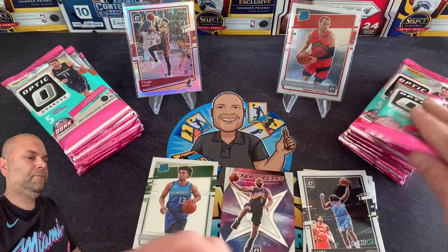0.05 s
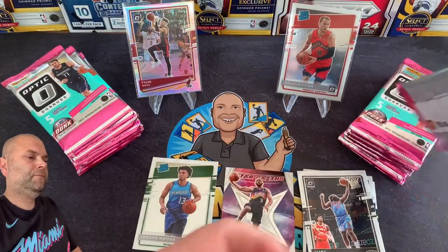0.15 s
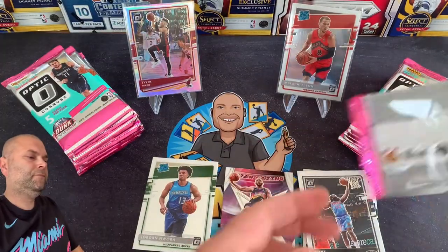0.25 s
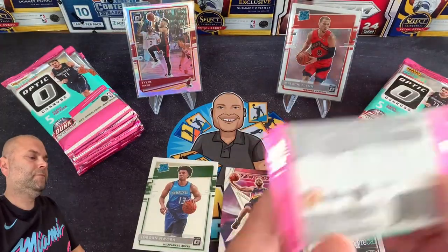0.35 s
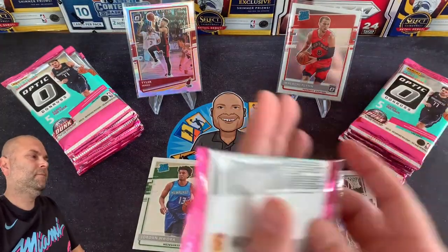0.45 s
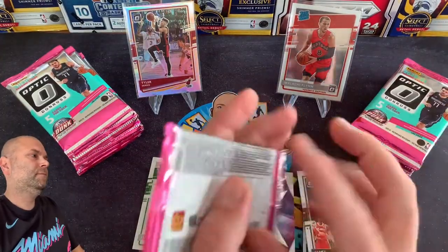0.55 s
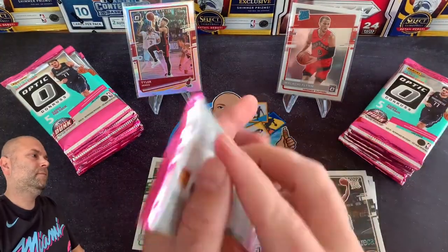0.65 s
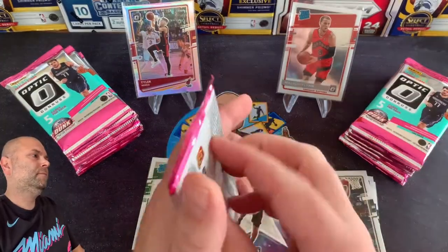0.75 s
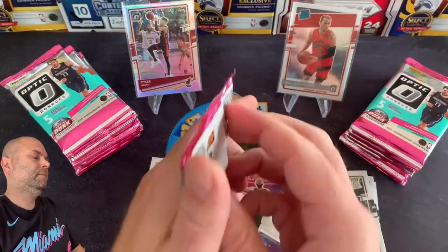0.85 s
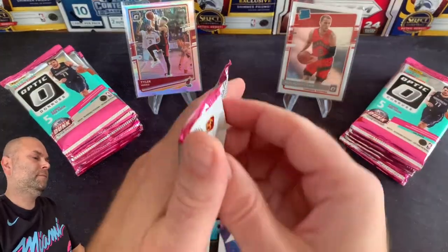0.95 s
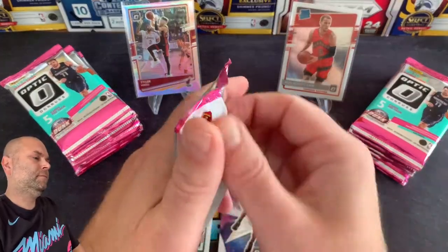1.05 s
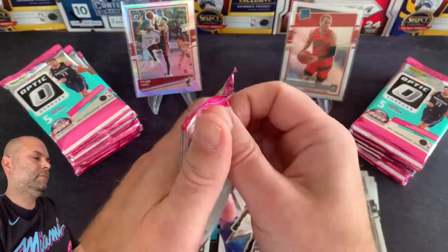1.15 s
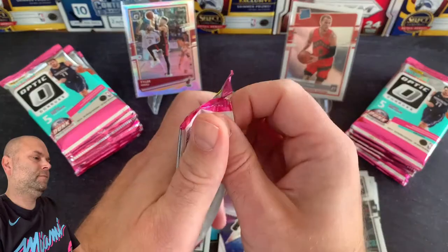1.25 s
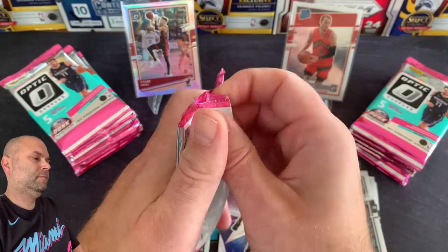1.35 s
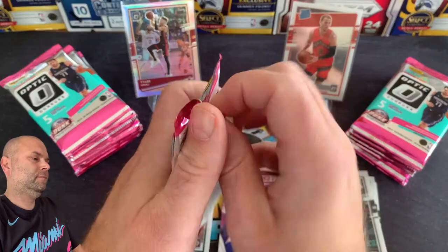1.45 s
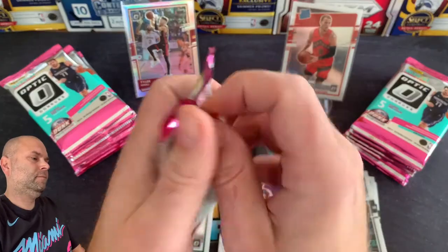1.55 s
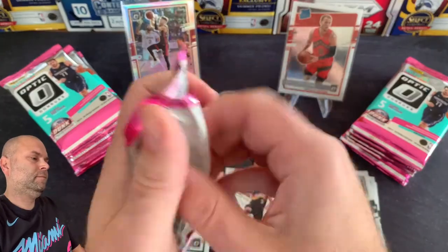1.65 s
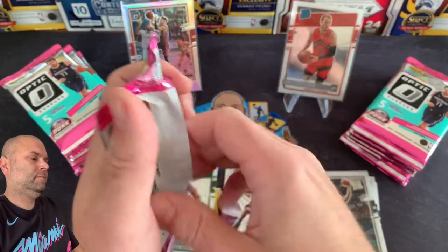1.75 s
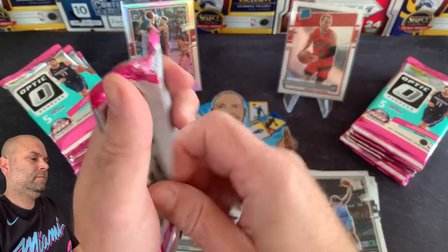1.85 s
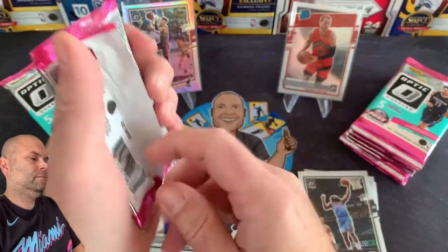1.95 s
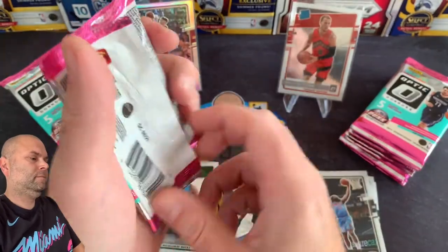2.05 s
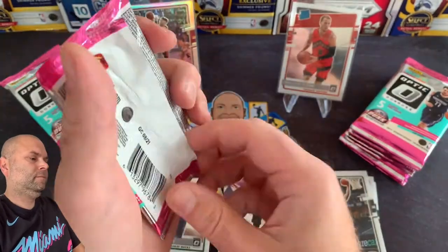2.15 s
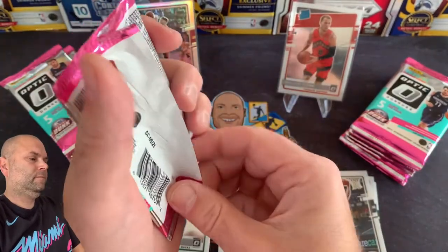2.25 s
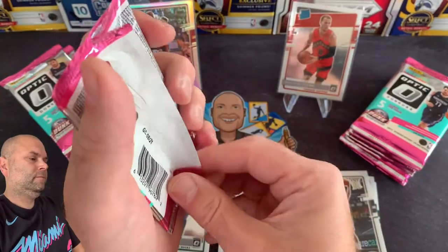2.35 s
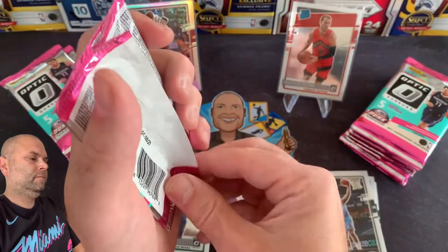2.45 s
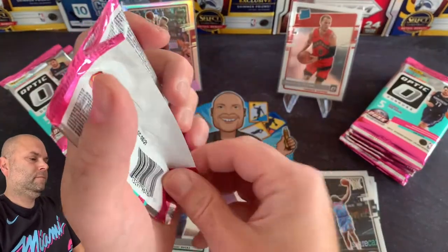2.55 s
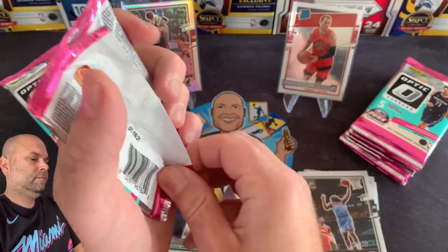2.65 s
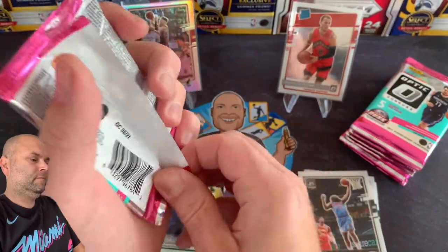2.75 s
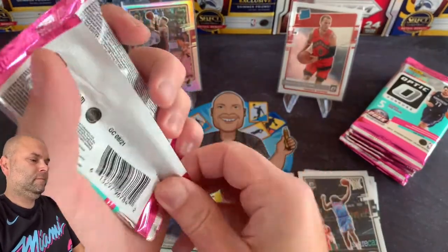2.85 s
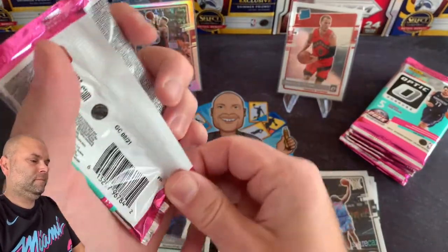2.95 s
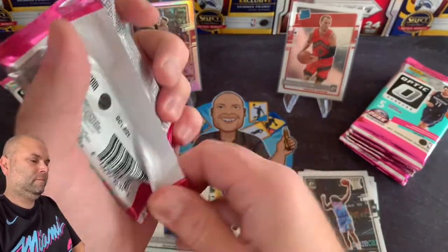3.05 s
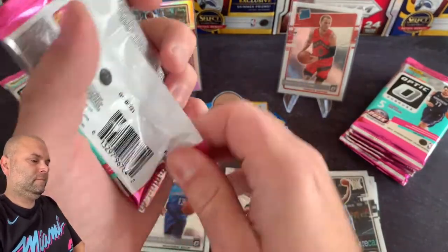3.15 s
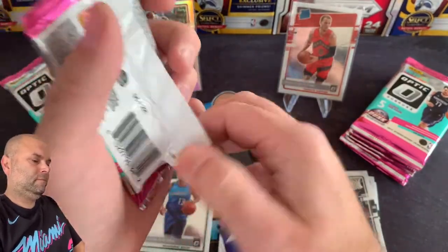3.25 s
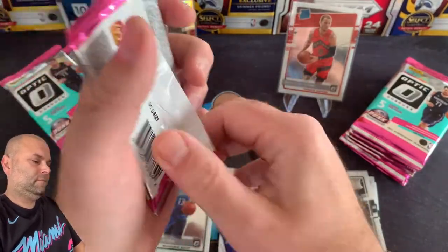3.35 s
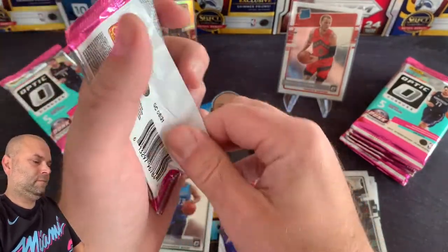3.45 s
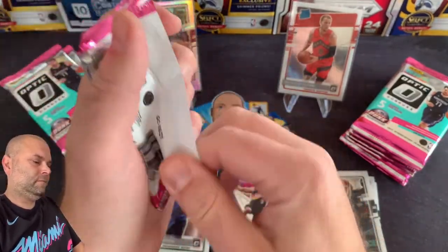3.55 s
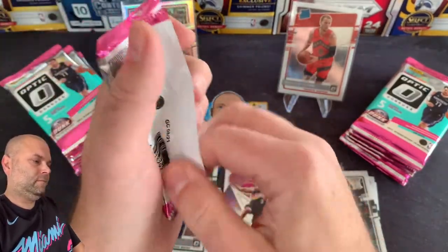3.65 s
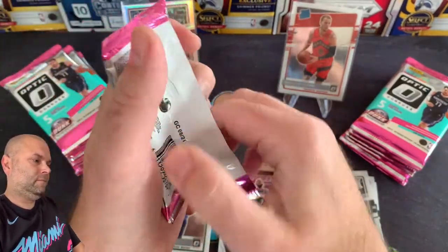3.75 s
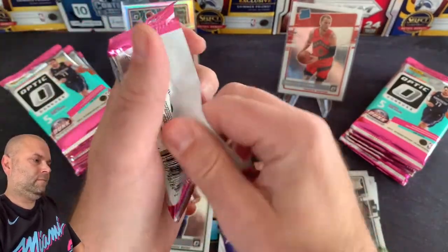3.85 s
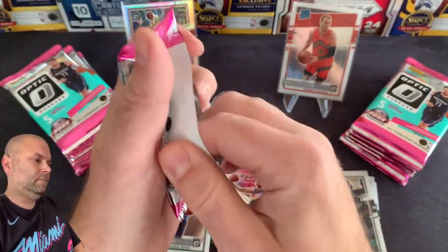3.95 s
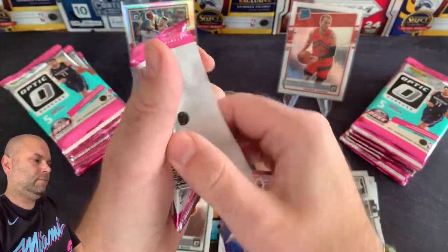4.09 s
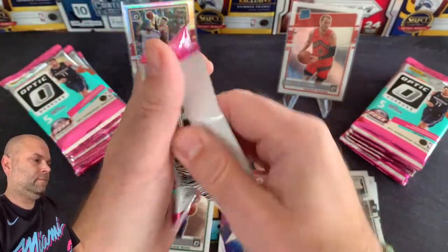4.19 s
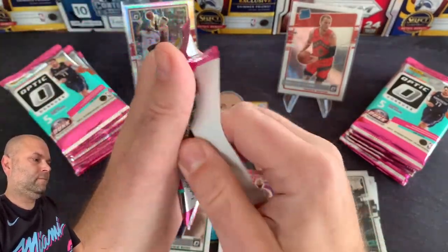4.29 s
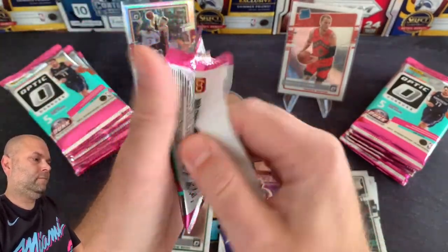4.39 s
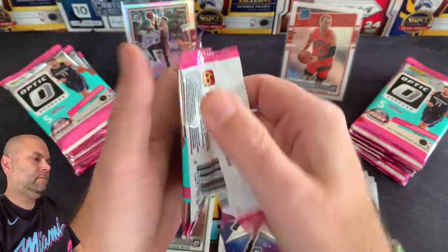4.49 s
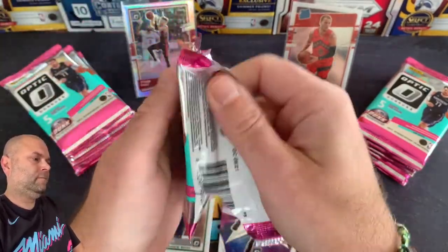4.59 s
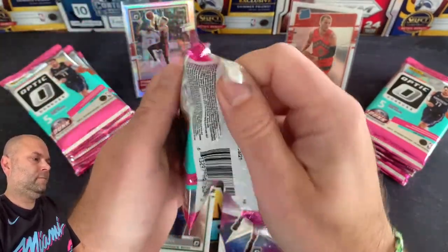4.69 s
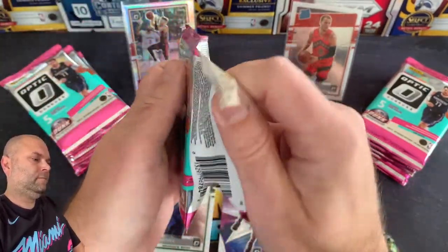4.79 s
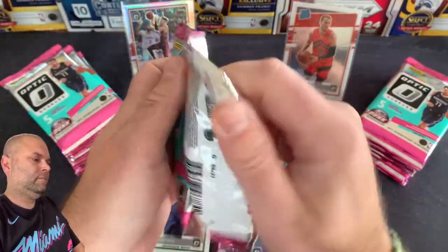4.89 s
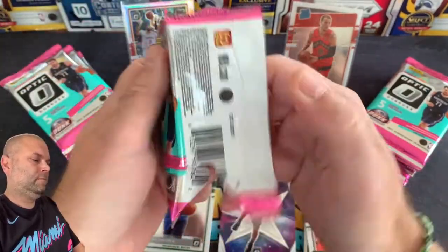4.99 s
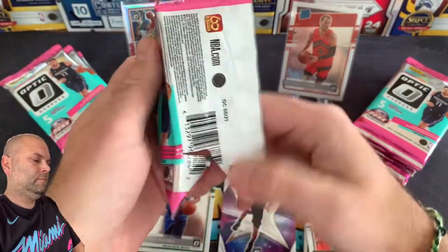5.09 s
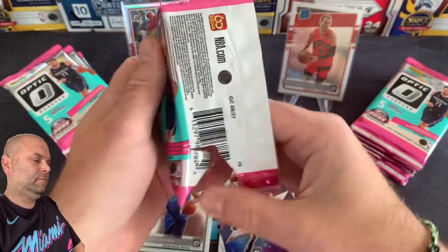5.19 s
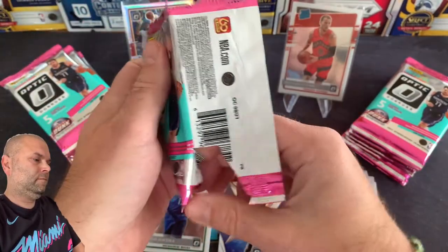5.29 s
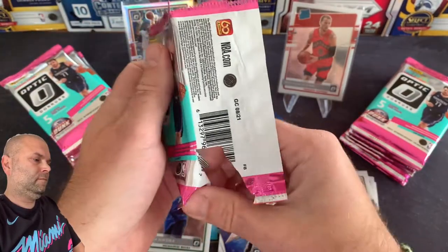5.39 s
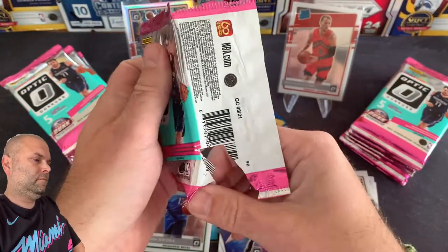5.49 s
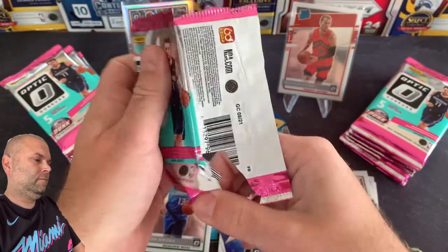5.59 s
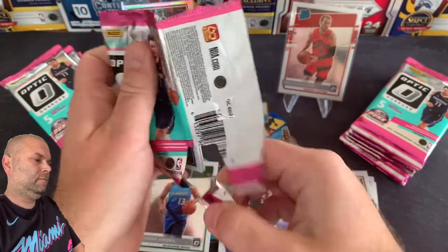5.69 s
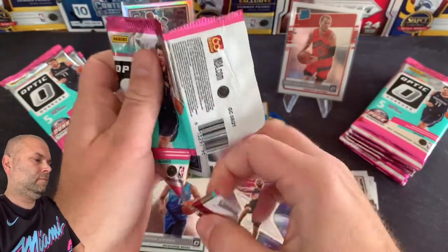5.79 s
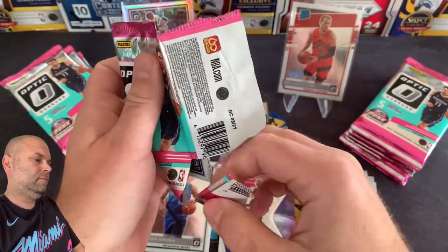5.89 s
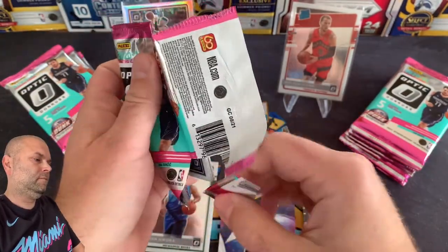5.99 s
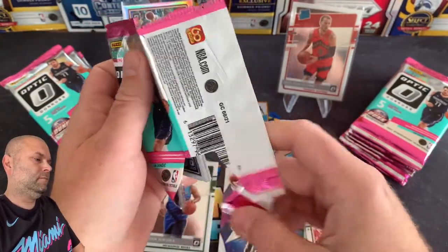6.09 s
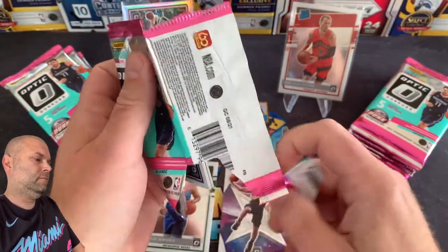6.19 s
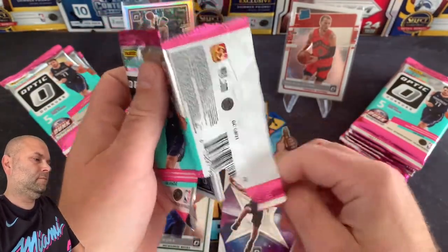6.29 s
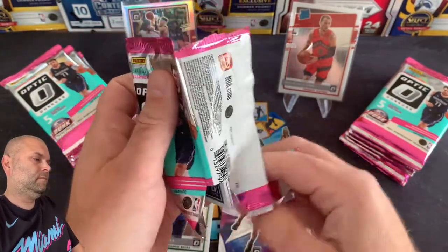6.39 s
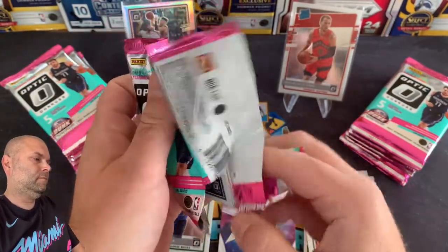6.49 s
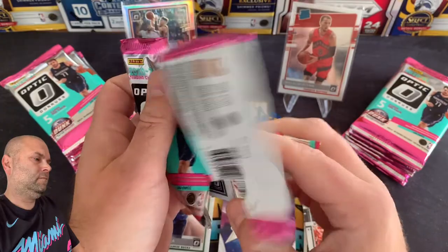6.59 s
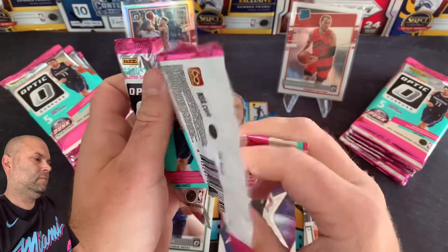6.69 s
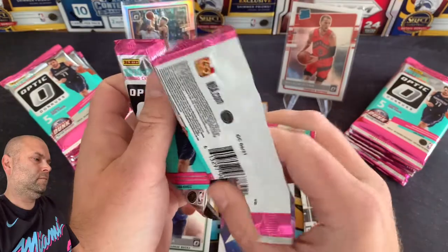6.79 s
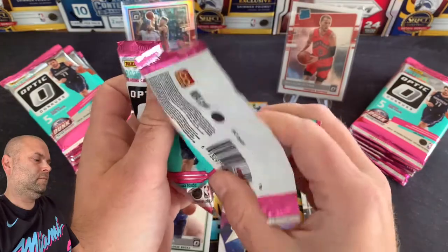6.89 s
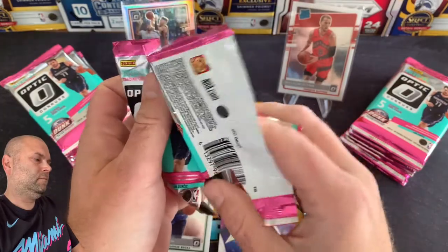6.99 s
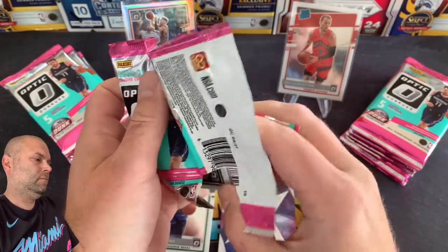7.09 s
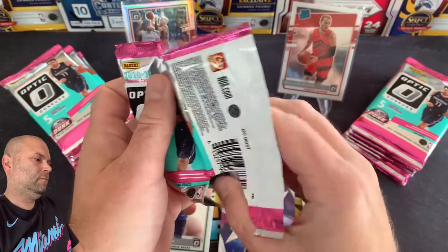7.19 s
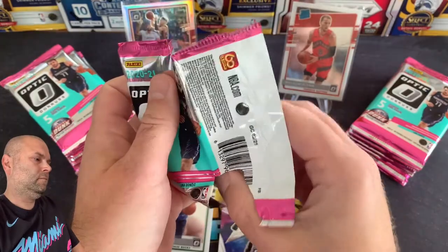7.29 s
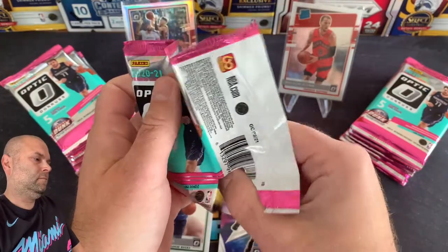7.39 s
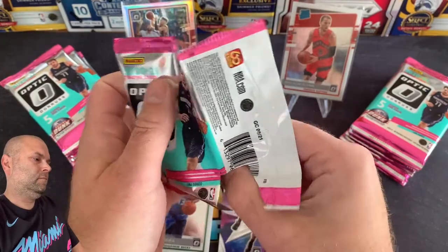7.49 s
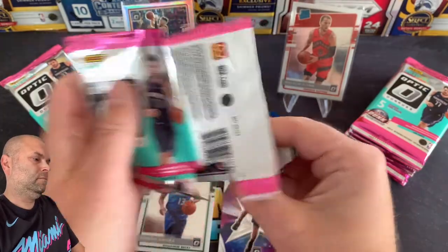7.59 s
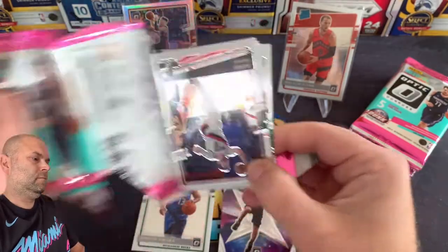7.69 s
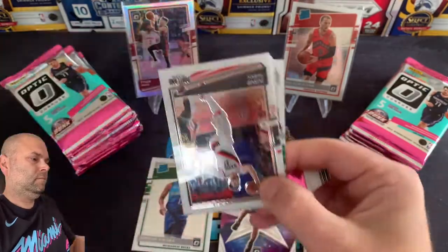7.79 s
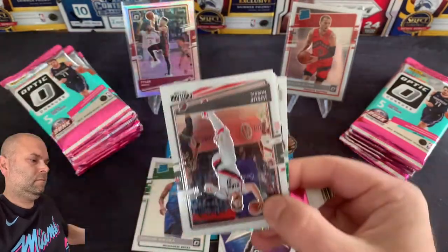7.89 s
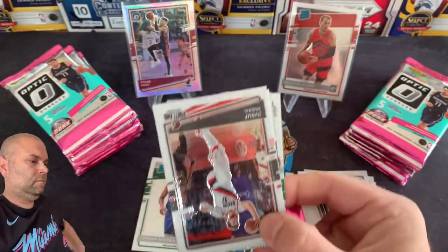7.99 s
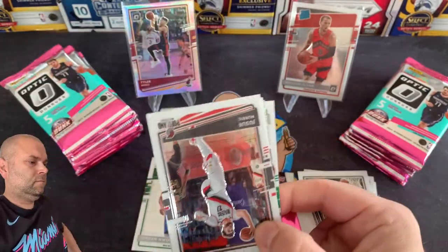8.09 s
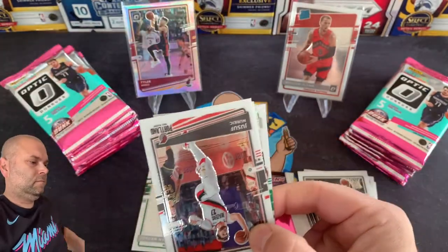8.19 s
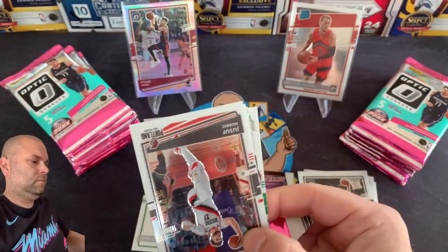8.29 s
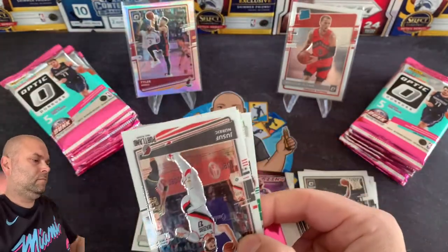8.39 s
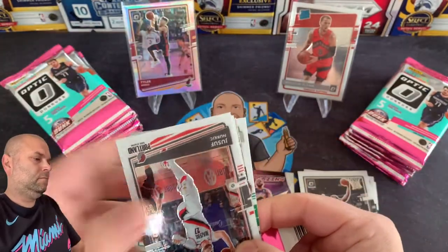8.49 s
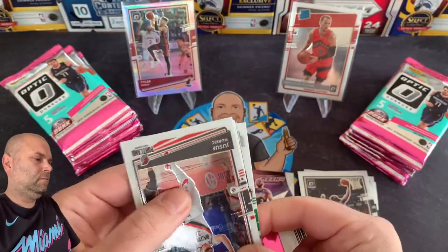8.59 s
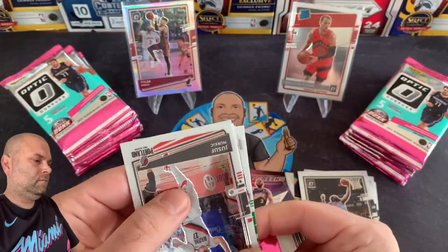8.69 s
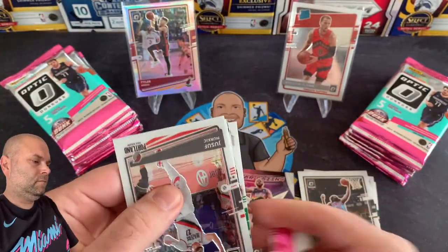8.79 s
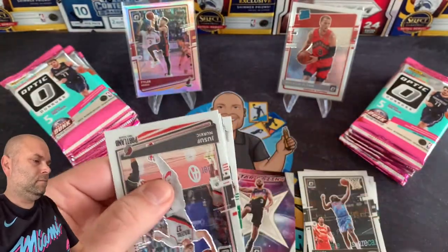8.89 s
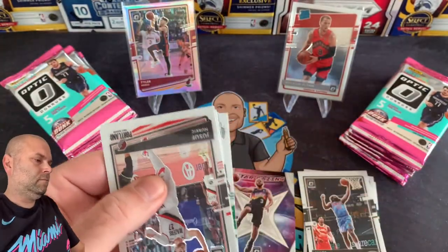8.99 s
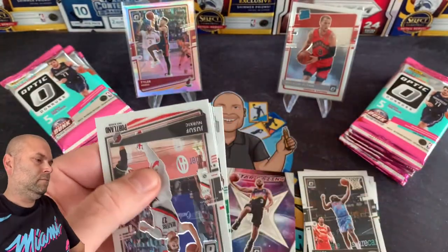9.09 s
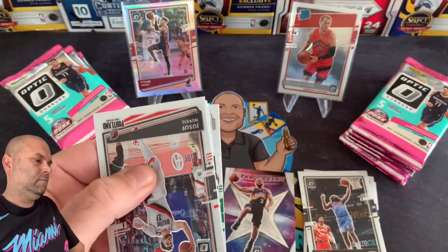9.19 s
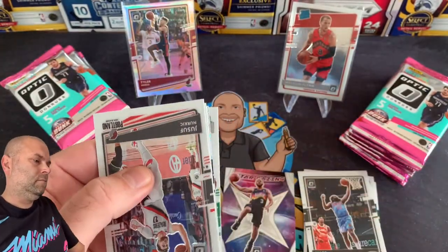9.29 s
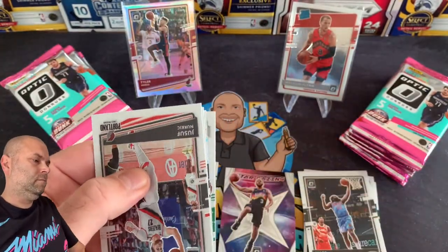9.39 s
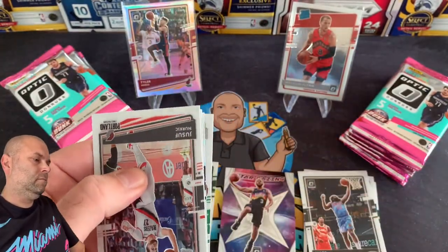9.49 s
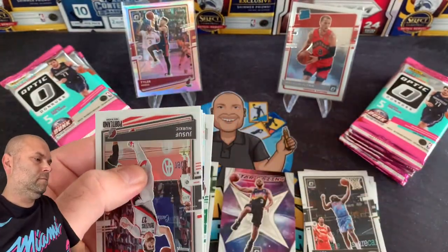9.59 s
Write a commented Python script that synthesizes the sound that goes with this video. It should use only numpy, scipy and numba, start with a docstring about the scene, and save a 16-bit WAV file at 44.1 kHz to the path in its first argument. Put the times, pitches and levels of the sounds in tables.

```python
"""A small foil pack is crinkled, ripped open and emptied of its cards over a desk, close to a phone's two ports.
Foil: each buckling crease rings a few facets as decaying sines; loud snaps stand over random crackle and bursts of ripping.
Cards: fingers thump the stack, heard as short dull clusters of sines; forearms rumble the desk as swells of low noise.
Further off, cards tick and the dropped wrapper settles as swarms of creases.
A hard-walled room answers by convolution with noise tails, over a low air rumble of shaped noise."""
import sys
import numpy as np
from scipy import signal
from scipy.fft import rfft, irfft, next_fast_len
from scipy.io import wavfile
from scipy.ndimage import uniform_filter1d
from numba import njit

SR = 44100
rng = np.random.default_rng(int(sys.argv[2]) if len(sys.argv) > 2 else 0)


def log_audio(samples):
    """Write samples as a 16-bit WAV file to the path given in sys.argv[1]."""
    # one column per channel
    frames = np.atleast_2d(samples).T
    # limit to full scale, then quantise
    limited = np.clip(frames, -1, 1)
    pcm = np.round(limited * 32767).astype(np.int16)
    wavfile.write(sys.argv[1], SR, pcm)


N = 425520  # samples


def undb(db):
    """Logarithmic level: 20 dB is a factor of ten in amplitude."""
    return 10 ** (np.asarray(db) / 20)


def over_hz(table, hz):
    """Logarithmic frequency axis: interpolate a table linearly over log frequency."""
    table_hz, values = np.transpose(table)
    return np.interp(np.log(hz + 1), np.log(table_hz), values)


def colour(x, response):
    """Linear filtering: multiply the spectrum by response(Hz)."""
    size = next_fast_len(x.shape[-1])
    hz = np.arange(size // 2 + 1) * SR / size
    return irfft(rfft(x, size) * response(hz), size)[..., :x.shape[-1]]


@njit
def ring(start, hz, cycles, size, turn, count):
    """Damped resonance: sines swell quickly and die in their number of cycles; two rows of unrelated phase."""
    out = np.zeros((2, count))
    for k in range(len(start)):
        fade = np.log(1000) / cycles[k] * hz[k] / SR
        step = np.exp(2j * np.pi * hz[k] / SR - fade)
        z = size[k] * fade * np.e * np.exp(2j * np.pi * turn[k, 0])
        other = np.exp(2j * np.pi * turn[k, 1])
        first = start[k] - int(1 / fade)  # the swell peaks at the given moment
        for n in range(int(8 / fade)):
            if 0 <= first + n < count:
                out[0, first + n] += n * z.imag
                out[1, first + n] += n * (z * other).imag
            z *= step
    return out


ABOVE_DB_PER_OCTAVE = 1.5  # how much weaker facets become above the strongest one


def octaves_above(hz, facet_hz):
    """Octave measure: distance above the strongest facet, counted up to 8 kHz and to 1.5 octaves."""
    return np.clip(np.log2(np.minimum(hz, 8000) / facet_hz), 0, 1.5) * (hz < 9500)


# relative strength of the foil's facets: (frequency [Hz], level [dB])
FOIL_FACETS = [(300, -26.5), (700, -22), (1300, -9.5), (2000, -4.5), (2700, -5), (3600, 3), (4300, 4),
               (5100, 0), (7000, 10.5), (10000, 5), (13000, 9), (16000, 4.5)]


def creases(s, db, body_db, crisp_db, facet_hz, lift_db, spread_s, bright_db=0., count=10):
    """Buckling: a crease releases its energy into facets over the whole range; one near facet_hz stands out."""
    chance = rng.random((len(s), count, 5))
    crease = np.arange(len(s))
    place = (np.arange(count) + chance[..., 0]) / count
    hz = 300 * (15900 / 300) ** (place ** .75)
    strongest = np.argmin(abs(np.log(hz / facet_hz[:, None])), axis=1)
    hz[crease, strongest] = facet_hz
    chance[crease, strongest, 1:3] = .5, .4  # no scatter: the strongest facet keeps the given moment
    # body acts below 2500 Hz and crispness above 7000 Hz, each complete after an octave
    low, high = np.clip(np.log2(2500 / hz), 0, 1), np.clip(np.log2(hz / 7000), 0, 1)
    facet_db = db[:, None] + over_hz(FOIL_FACETS, hz)
    facet_db += low * body_db[:, None] + high * crisp_db[:, None]
    facet_db += 9 * (chance[..., 1] - .5)
    facet_db[crease, strongest] += lift_db
    facet_db -= ABOVE_DB_PER_OCTAVE * octaves_above(hz, facet_hz[:, None])
    facet_db += np.reshape(bright_db, (-1, 1)) * np.clip(np.log2(hz / 4500), -2, 1)
    # however it is shared among the middle facets, a crease releases the energy that its level says
    middle = (hz > 2000) & (hz < 9000)
    middle_db = 20 * np.log10(np.sqrt(np.sum(middle * undb(facet_db) ** 2, axis=1)))
    facet_db += (db - middle_db)[:, None]
    # the buckle runs along the crease, so the facets do not peak together
    start = ((s[:, None] + spread_s * (chance[..., 2] - .4)) * SR).astype(np.int64)
    cycles = 11 * (hz / 4000) ** 0.6
    cycles[crease, strongest] *= 1.15  # the strongest facet rings on
    turn = chance[..., 3:].reshape(-1, 2)
    return ring(start.ravel(), hz.ravel(), cycles.ravel(), undb(facet_db).ravel(), turn, N)


# relative levels of the air noise: (frequency [Hz], spectral level [dB per Hz])
AIR_SPECTRUM = [(25, 7.5), (60, 1.5), (150, 11.5), (260, 8.5), (450, -17), (900, -19), (2200, -18.5),
                (4000, -31.5), (8000, -30), (16000, -27.5)]
AIR_DB = -47.5  # level before ducking
DUCK_DB, DUCK_RATIO = -29, 1  # threshold [dB], reduction [dB per dB over it]


def ducked_air(close):
    """Shaped noise under gain control: the steady air sinks as the slow average of the close sound rises."""
    air = colour(rng.standard_normal((2, N)), lambda f: undb(over_hz(AIR_SPECTRUM, f)))
    power = uniform_filter1d(close[0] ** 2, int(.8 * SR))
    loud_db = 10 * np.log10(power + 1e-12)
    duck_db = DUCK_RATIO * np.maximum(loud_db - DUCK_DB, 0)
    return air * undb(AIR_DB - duck_db) / air.std()


# course of the handling, relative levels:
# (time [s], crackle between the snaps [dB], card body [dB], crispness [dB])
HANDLING_COURSE = [(0, -37, -0.5, -0.5), (.22, -49, -17, -1.5), (.3, -39.5, -7.5, -1), (.74, -48.5, 7, -8),
                   (.9, -41, -13, -13.5), (.95, -34.5, -8.5, -2.5), (1.71, -32, -3.5, -10.5),
                   (2.0, -34, -9, -9), (2.43, -40, -9.5, -14), (2.58, -40, -8, -18),
                   (2.68, -38.5, -0.5, -21.5), (2.74, -49.5, -1.5, -9.5), (2.98, -26, -4, -8.5),
                   (3.38, -34.5, -7.5, -17.5), (3.6, -29.5, 1, -11), (4.22, -35.5, -6, -9),
                   (4.5, -39, 3.5, -11), (4.7, -32.5, -9, -7.5), (4.95, -35, -9, -3), (5.08, -43.5, 3, -11),
                   (5.63, -37, -3.5, -10), (5.73, -37, -1.5, -12), (5.87, -58.5, -20, -24),
                   (6.0, -47, 0, 2), (6.2, -69, 13, -6), (6.28, -42.5, 7.5, -8), (6.55, -41, -14.5, -14),
                   (6.75, -47.5, 6.5, -3), (6.96, -38, -3, -24), (7.2, -59, 4, -5), (7.31, -39, 2.5, 0.5),
                   (7.42, -40.5, 1, 1), (7.51, -33, 1.5, -7.5), (7.78, -44, -6.5, -15),
                   (7.999, -35.5, -3.5, -12), (8.3, -73, 6, -32)]
HANDLING_END_S = HANDLING_COURSE[-1][0]


def handling(s):
    """Piecewise-linear envelope: crackle level, card body and crispness at the given moments."""
    t, *columns = np.transpose(HANDLING_COURSE)
    return (np.interp(s, t, column) for column in columns)


# each snap has a short skirt of small creases, crisper than the rest
SKIRT_DB, SKIRT_BEFORE_S, SKIRT_AFTER_S, SKIRT_CRISP_DB = -20, 0.0021, 0.0035, 10.5


def snap_skirts(s):
    """Exponential skirts: power of the small creases around each snap."""
    snap_s, snap_db = np.transpose(LOUD_CREASES)[:2]
    late = s[:, None] - snap_s
    skirt = np.exp(-np.maximum(late / SKIRT_AFTER_S, -late / SKIRT_BEFORE_S))
    return np.sum(undb(snap_db + SKIRT_DB) ** 2 * skirt, axis=1)


# the seam gives way in bursts of crackle:
# (start [s], end [s], crackle level before scatter [dB], brightness [dB per octave])
SEAM_RIPS = [(0.745, 0.766, -33, 0), (0.817, 0.824, -30, -7), (0.946, 0.996, -36, -3),
             (1.723, 1.741, -29, 9), (1.775, 1.83, -29.5, 3), (2.954, 3.027, -36, 0.3),
             (3.418, 3.501, -18.5, 0), (3.801, 3.838, -23, -2), (3.834, 3.87, -24, 2),
             (4.13, 4.159, -26, -1), (4.157, 4.208, -26.5, -2), (4.588, 4.64, -28, -2.5),
             (5.217, 5.259, -33, 3), (5.265, 5.294, -31.5, 2.5), (5.362, 5.396, -27.5, 9),
             (5.528, 5.556, -28, -1.5), (5.563, 5.615, -28.5, -0.5), (6.529, 6.564, -30.5, -6.5),
             (7.492, 7.525, -28, -3), (7.549, 7.581, -25.5, -3)]


def rips(s):
    """Power addition: ripping power at the given moments, and the same weighted by its brightness."""
    power, bright = 0, 0
    for start, end, rip_db, bright_db in SEAM_RIPS:
        burst = ((s > start) & (s < end)) * undb(rip_db) ** 2
        power, bright = power + burst, bright + burst * bright_db
    return power, bright


PATCH_S, PATCHY_DB = .018, 4  # the crackle comes in patches: spacing, deviation of level
TINT_S, TINT_DB = .03, 3.5  # some brighter, some duller: spacing, deviation [dB per octave]


def crackle(rate=2400., scatter_db=0.0, rip_scatter_db=0.9):
    """Poisson process: small creases at random moments, strengthened around the snaps and in the rips."""
    chance = rng.random((22000, 3))
    s = np.cumsum(-np.log(chance[:, 0])) / rate
    db, body_db, crisp_db = handling(s)
    db[s > HANDLING_END_S] = -120
    db = db + PATCHY_DB * np.interp(s / PATCH_S, np.arange(1000), rng.standard_normal(1000))
    rip_power, rip_bright = rips(s)
    lively = snap_skirts(s) + rip_power
    total = lively + undb(db) ** 2
    lively_share = lively / total
    tint = np.interp(s / TINT_S, np.arange(1000), rng.standard_normal(1000))
    bright_db = (rip_bright + undb(db) ** 2 * TINT_DB * tint) / total
    # nearly even in strength, slightly scattered around the snaps and in the rips
    scatter = (scatter_db + rip_scatter_db * lively_share) * (np.log(chance[:, 1] + 0.054) + 0.72)
    db = 10 * np.log10(total) - scatter
    crisp_db = crisp_db + SKIRT_CRISP_DB * lively_share
    return creases(s, db, body_db + 7.0, crisp_db, 2000 * 4 ** chance[:, 2], 1.0, .0018, bright_db, count=8)


def crinkles(rate=75., above_db=3.5, scatter_db=3.5, crisp_above_db=4.0):
    """Poisson process: sparser, middling creases stand out singly, each with its own strongest facet."""
    chance = rng.random((800, 3))
    s = np.cumsum(-np.log(chance[:, 0])) / rate
    db, body_db, crisp_db = handling(s)
    db[s > HANDLING_END_S] = -120
    db = db + above_db - scatter_db * np.log(chance[:, 1] + 0.17)
    return creases(s, db, body_db, crisp_db + crisp_above_db, 1500 * 5 ** chance[:, 2], 7.0, .002, count=14)


# loud creases, body and crispness relative to the foil:
# (time [s], level of the middle facets together [dB], strongest facet [Hz], crispness [dB], body [dB])
LOUD_CREASES = [(0.0771, -9, 8500, -1.5, 1.5), (0.1441, -22.5, 5030, -11, 11.5),
                (0.29, -21.5, 2650, 1.5, 5), (0.298, -12, 6100, -2, -0.5), (0.3324, -4, 6400, -6, 18.5),
                (0.342, -13, 4400, 13, 3.5), (0.354, -15, 9160, 10, 21), (0.4827, -18.5, 5650, -2, -9),
                (0.532, -18.5, 7710, -3, 2), (0.5547, -12, 5840, -17, -14), (0.5702, -5.5, 7450, -7, 6),
                (0.582, -8, 6070, 7, -13.5), (0.6292, -17.5, 9350, 6, -1.5), (0.669, -17.5, 6500, 0.5, -8),
                (0.775, -10, 7250, 8, 5.5), (0.8107, -5.5, 7060, -14, -19), (0.8214, -2, 5000, 1.5, -3),
                (0.829, -0.5, 8600, 8, -10.5), (0.8352, -11, 6950, -6.5, -11.5),
                (0.8427, -18.5, 5070, 14.5, -12), (0.859, -13, 7900, -0.5, -24.5),
                (0.8772, -7, 7410, -0.5, -18), (0.8865, -8, 7460, -2, 9.5), (0.9323, -10, 4200, 2, -3),
                (0.9423, -4.5, 5100, 0, -23), (0.954, -14, 4910, 0.5, 15), (0.9632, -13, 7240, 17, -9),
                (0.9759, -4.5, 8130, 5.5, -10.5), (0.9878, -14, 8300, 5, -15), (1.0149, -9, 5100, 8.5, -7),
                (1.0198, -3, 3270, -1, -14.5), (1.0622, -17, 5040, 5, -15.5), (1.071, -18, 4800, 4, 7),
                (1.075, -6, 8850, 10.5, -9), (1.102, -13, 3230, -0.5, 10.5), (1.1363, -16, 7560, 3, -13),
                (1.142, -8, 4000, 4, 3.5), (1.153, -15.5, 3220, -1, 9.5), (1.1637, -15.5, 3530, 18.5, -11),
                (1.1804, -15.5, 6600, 9, -3.5), (1.221, -13.5, 5900, 0.5, 1), (1.2286, -5, 5870, -5, -19.5),
                (1.2357, -11.5, 4260, -5, -20.5), (1.2539, -5.5, 3040, 9, 10), (1.308, -6, 4300, -8, -6),
                (1.3177, -9, 7170, 5.5, -7), (1.3277, -17, 6700, 19.5, -5.5), (1.3457, -15, 6700, -2, -14),
                (1.357, -12.5, 6500, -4, -11), (1.394, -14.5, 3480, 1, 3.5), (1.404, -14, 7660, -1, 0),
                (1.429, -15.0, 8600, 15, -18), (1.4442, -4, 8160, 3.5, -1.5), (1.4601, -7.5, 6200, 3, -2.5),
                (1.4627, -20, 6340, 9, -11), (1.469, -2.5, 6050, 8.5, 12.5), (1.482, -11.5, 3660, 4, 12),
                (1.503, -5, 6200, 4.5, -13), (1.506, -16, 3960, -2, -3.5), (1.5157, -2, 6340, -0.5, 0.5),
                (1.521, -14.5, 6000, -3.5, -10), (1.524, -11, 3670, 2.5, -10.5),
                (1.538, -11, 1600, -2.5, 1.5), (1.581, -2.5, 8300, 3, -8.5), (1.591, -6.5, 4000, 8, -1),
                (1.6186, -8, 3800, 2, 9), (1.6232, -5, 8050, 5.5, -17), (1.65, -6, 6510, -19, 15.5),
                (1.691, -10, 4440, -6, -1), (1.6968, -19, 1970, 3, 11), (1.701, -8.5, 5560, 2, -6),
                (1.725, -11, 4550, -3, -5.5), (1.731, -4, 7700, 10.5, -10), (1.74, -0.5, 8700, 5, -9),
                (1.7736, -2.5, 3670, -13, -17), (1.7817, -5, 3520, 3.5, -12), (1.79, -0.5, 8670, -3, -9),
                (1.8027, -18, 7020, 6.5, -5), (1.8194, -11, 8830, 10, -11.5), (1.8295, -6, 4700, 4.5, -8),
                (1.8365, -12.5, 4340, -2.5, -19), (1.877, -15.5, 6300, 2, -2),
                (1.915, -20.5, 4770, -2.5, -12.5), (1.93, -7, 4700, -1.5, -9),
                (1.9402, -8.5, 6370, 0.5, -3), (1.986, -15, 1960, 3, -2), (2.0365, -13.5, 3850, 1.5, 13),
                (2.041, -13.5, 4900, -2, -2), (2.061, -17, 3900, 8, 7), (2.091, -6.5, 6670, 7.5, -9),
                (2.097, -14.5, 5450, -4.5, -15), (2.173, -9, 1940, -10, 4), (2.1807, -10, 3630, -3, 7.5),
                (2.3064, -15.5, 2020, 0.3, 6), (2.381, -7.5, 5800, 3.5, -18), (2.443, -9, 5900, 0, 1.5),
                (2.4482, -11.5, 6000, -3, 3), (2.492, -9, 8400, 6.5, -15), (2.502, -14, 5000, 13, -5),
                (2.5607, -9, 2050, 0, -5.3), (2.7048, -13.5, 7580, -10.5, 6), (2.713, -10, 8000, 1.5, -8.5),
                (2.733, -6.5, 7950, 9.5, -12), (2.7654, -11.5, 6060, 5.5, -25.5),
                (2.771, -11, 6300, -5.5, -11), (2.8008, -1, 7940, 7, -15), (2.8093, -6.5, 8250, -4, -3.5),
                (2.819, -11.5, 8300, 6.5, -1), (2.8241, -12, 5960, -2.5, -11.5),
                (2.8386, -10, 6200, 6, -7.5), (2.8968, -5.5, 3550, 4, 4), (2.9198, -11.5, 2110, 8.5, 0),
                (2.9436, -9, 1673, 8, 2.5), (2.959, -13.5, 3830, -0.5, -14), (2.9652, -9.5, 3920, 1, -1),
                (2.9754, -1.5, 8100, -12, -8), (2.9854, -8.5, 3300, 4.5, 5), (3.0487, -3.5, 4360, -3.5, -7),
                (3.0604, -9, 8830, 3, -3), (3.079, -13, 9700, 2.5, 0), (3.0854, -6, 7840, 5, -9.5),
                (3.1105, -13.5, 3860, 2.5, 5), (3.1398, -10.5, 4400, 6, 8), (3.1923, -11.0, 4680, -2, 9.5),
                (3.2505, -12, 3680, -15.5, 12), (3.283, -2.2, 3666, -19.5, -8.5),
                (3.2923, -8.5, 3360, -5.5, 7.5), (3.322, -10.5, 2090, -8, 0), (3.354, -7, 5800, 3.5, -17),
                (3.358, -12.5, 3380, 4, -15.5), (3.4012, -19.5, 3850, -12.5, -10.5),
                (3.4208, -9, 3600, 0, 8.5), (3.431, -14, 3790, -4.5, 5), (3.4372, -5.5, 3830, -11, -13),
                (3.4437, -11.5, 2000, 4, 2.5), (3.451, -8, 4740, 6.5, -1.2),
                (3.464, -4.5, 3450, -5.5, -1.5), (3.4794, -6, 7940, 9, 6), (3.492, -8.5, 1780, -8, -10),
                (3.5571, -12.5, 3620, 4.5, 1), (3.606, -7, 7750, 3.5, 0.5), (3.625, -13, 3800, -7, -9),
                (3.6361, -3.5, 3440, -3.5, 11), (3.732, -10.5, 4750, 3, 6.5), (3.7368, -4.5, 6800, 2, 11.5),
                (3.7624, -19, 8270, 16, -14.5), (3.774, -6.5, 7240, 8, 0), (3.784, -14, 4500, -4, -9),
                (3.8086, -2, 3430, -2.5, -0.5), (3.834, -7, 3170, 2.5, 2), (3.8558, -9, 6440, -5, -7),
                (3.8601, -13, 4500, -3, -1), (3.869, -4, 4420, -1.5, 2.5), (3.8777, -3, 5960, -8, -13),
                (3.9456, -8.5, 3600, -9.5, -8), (4.0191, -3.5, 3230, -16, -4.5),
                (4.0307, -11, 1490, 0.5, 2), (4.037, -5, 3730, -1, -5.5), (4.044, -6.5, 6800, -5.5, 2),
                (4.0697, -16, 4870, 5, -2.5), (4.1238, -3.5, 4490, -3.5, 2.5), (4.134, -9.5, 4680, -4, -13),
                (4.1407, 0, 4830, 6, -4.5), (4.1462, -8, 5000, -6, -11), (4.176, -6, 7600, 10, -9),
                (4.1824, -7.5, 3180, 9.5, -6.5), (4.195, -13.5, 3900, 17, -0.5),
                (4.2038, -3, 8230, 1.5, -4), (4.224, -13, 5580, 6.5, 10.5), (4.2679, -18, 8000, 10, -5),
                (4.333, -6, 5900, 2, -3), (4.3478, -5, 6000, 5.5, -16), (4.357, -5.5, 8200, 4, -7),
                (4.4153, -24.5, 9100, 2, -9), (4.533, -20, 2410, -5, -1), (4.5452, -6.5, 7430, -1.5, -3),
                (4.554, -5, 5000, 8, 1.5), (4.585, -12, 3620, 2.5, -14.5), (4.5964, -17, 15350, 16.5, -5.5),
                (4.6098, -3.5, 3720, -1, 13), (4.6714, -6.5, 2350, 1, -9), (4.7238, -20.5, 2240, 7, 0.5),
                (4.7339, -19.5, 1550, 9.5, 7.5), (4.751, -13.5, 3400, 0.5, -10),
                (4.809, -18.5, 8300, 23, -5), (4.831, -25, 6330, 6, 5.5), (4.8403, -13.5, 8700, 10.5, -9.5),
                (4.8515, -12.5, 9700, 5, -6), (4.8854, -9.5, 6950, 1, 15), (4.9011, -5.5, 3840, -2, 9.5),
                (4.9237, -5, 8910, 0, 1), (4.9475, -9.5, 4470, 6.5, -4), (5.0347, -8, 8200, 10, 8.5),
                (5.1578, -8.5, 6620, 4, 3), (5.2629, -8.5, 7700, -11, -14), (5.336, -20.5, 1980, 4, -4),
                 (5.4997, -22, 3500, -13, 14), (5.5543, -11.5, 1800, 5, 1.5), (5.5711, -19, 1460, 3, 14.5),
                (5.5835, -2.5, 8600, 12, 3), (5.596, -18, 4400, 2, 4), (5.6747, -24, 3500, -15, -5),
                (5.686, -21.5, 9020, 12, -16), (5.7014, -18, 8400, 11, 3), (5.72, -21, 3970, -4, 19),
                (5.97, -26.5, 8700, 21, -13), (6.261, -19.5, 6300, -20, -8), (6.3286, -23.0, 1530, 4, 4.5),
                (6.345, -18, 9800, -3, 13), (6.356, -14, 8900, 16, -7), (6.3828, -26, 1810, 13, 15.5),
                (6.4023, -17, 1870, -14, 8), (6.407, -18.5, 6100, 6, 5), (6.455, -21.5, 2280, 2, -8),
                (6.485, -5.5, 8800, 17, -21), (6.539, -18, 1720, 2, -8), (6.6012, -17.5, 4210, -6.5, 9),
                (6.8162, -14, 1480, 2, -19), (6.8495, -18, 1530, -1, -2), (6.8735, -11.5, 3990, 0, -4),
                (6.9535, -15, 5860, 0, 6), (7.2018, -26, 9040, -1, 7), (7.3474, -18, 9470, -3, -3),
                (7.3736, -21, 8100, 15, -11), (7.4045, -19.5, 1910, -6, 6), (7.499, -22, 1500, 3, 4),
                (7.5551, -5, 5460, -2, -1), (7.6416, -7, 1920, -1, -4), (7.6463, -6.5, 6800, 7, 10),
                (7.7082, -6, 6060, -2.5, -20), (7.718, -13, 5280, -1, -17), (7.8384, -14.5, 6880, -2, -1),
                (7.8516, -16, 5000, -23, -18), (7.8817, -11.5, 9100, -6, 7), (7.9375, -12.5, 5970, -4, 9),
                (7.997, -23, 8850, 8, -3)]


def snaps():
    """Modal excitation: dull loud creases favour one facet, high ones lean slightly towards the treble."""
    s, db, hz, crisp_db, body_db = np.transpose(LOUD_CREASES)
    lift_db = 10.0 + 0.26 * np.maximum(-crisp_db, 0) * (hz > 2500)
    bright_db = 1.1 * np.log2(hz / 4500)  # dB per octave
    return creases(s, db, body_db, crisp_db, hz, lift_db, .0012, bright_db, count=28)


POPS_PER_S, POP_ABOVE_DB, POP_SCATTER_DB = 45., -3, 2.5  # level is set against crackle plus card body


def pops():
    """Poisson process: small knocks of the cards while the pack is handled; rows of s, dB, Hz."""
    chance = rng.random((500, 3))
    s = np.cumsum(-np.log(chance[:, 0])) / POPS_PER_S
    db, body_db, _ = handling(s)
    db = db + body_db + POP_ABOVE_DB - POP_SCATTER_DB * np.log(chance[:, 1] + 0.054)
    hz = 400 * 2.32 ** chance[:, 2]
    return np.transpose([s, db, hz])[s < HANDLING_END_S]


# fingers and cards knocking: (time [s], level before the split into rings [dB], main pitch [Hz])
CARD_KNOCKS = [(0.3339, -30, 800), (0.3527, -26, 750), (0.575, -23.5, 307), (0.6296, -21, 400),
               (0.8258, -21, 770), (0.959, -28, 480), (1.5264, -25.5, 447), (1.7345, -26.5, 544),
               (1.7888, -25, 554), (2.173, -32, 680), (2.8098, -27, 800), (3.449, -22.5, 535),
               (3.4759, -19.5, 557), (3.6075, -23.5, 417), (3.7772, -19, 514), (3.81, -20, 730),
               (3.827, -27, 574), (3.8605, -16, 800), (3.8802, -25, 774), (4.0203, -20, 816),
               (4.1465, -14.5, 800), (4.1831, -17.5, 480), (4.2069, -20, 466), (4.3363, -19, 800),
               (4.339, -23, 196), (4.491, -26, 544), (4.533, -24, 448), (4.56, -19.5, 435),
               (4.6204, -14, 606), (4.6404, -15, 460), (4.6672, -18.5, 565), (4.702, -22.5, 269),
               (4.731, -20, 433), (4.764, -19.5, 290), (4.7865, -18, 670), (4.811, -24, 470),
               (4.844, -22, 420), (4.861, -17, 258), (4.9036, -24, 685), (5.2662, -19, 540),
               (5.341, -27, 475), (5.5566, -23, 685), (5.5765, -21, 417), (5.5975, -20.5, 423),
               (5.936, -32.5, 530), (6.4038, -17.5, 717), (6.536, -17.5, 467), (6.553, -26, 527),
               (6.5757, -23, 398), (6.8792, -26, 230), (6.9292, -23.5, 473), (7.313, -22, 247),
               (7.4876, -16.5, 570), (7.5054, -21, 266), (7.527, -25, 152), (7.6487, -22, 287),
               (8.1102, -30, 442), (9.104, -34, 248)]


def thumps():
    """Damped resonance of the card stack: each knock is a main ring with five weaker, ragged neighbours."""
    s, db, hz = (column[:, None] for column in np.vstack([CARD_KNOCKS, pops()]).T)
    chance = rng.random((len(s), 6, 4))
    main = np.arange(6) == 0
    hz = hz * np.where(main, 1, 2 ** (2.696 * chance[..., 0] - .9))
    s = s + np.where(main, 0, 0.016 * (chance[..., 1] - .45))
    db = db + np.where(main, -1.5, -9.5)
    cycles = 3.35 * (hz / 400) ** 0.924
    start = (s * SR).astype(np.int64)
    turn = chance[..., 2:].reshape(-1, 2)
    return ring(start.ravel(), hz.ravel(), cycles.ravel(), undb(db).ravel(), turn, N)


# forearms shift on the desk: (middle [s], time from middle to 1/e [s], RMS level at the middle [dB])
DESK_RUMBLES = [(0.672, 0.17, -44.5), (4.706, 0.71, -48.5), (5.593, 0.15, -49), (6.607, 0.11, -38.5),
                (7.428, 0.15, -39), (7.522, 0.018, -33.5)]


def rumbles():
    """Structure-borne sound: low-passed noise under Gaussian swells, carried through the desk."""
    t = np.arange(N) / SR
    noise = colour(rng.standard_normal((2, N)), lambda f: f / 90 / (1 + (f / 140) ** 3))
    swells = sum(undb(db) * np.exp(-((t - s) / half) ** 2) for s, half, db in DESK_RUMBLES)
    return noise / noise.std() * swells


# cards ticking and the wrapper settling across the desk, levels before scatter:
# (start [s], level [dB], time scale [s], strongest facet [Hz], its lead [dB], crispness [dB], echo send [dB])
DESK_RUSTLES = [(8.409, -35, 0.021, 3830, 1, -3, 13.5), (8.42, -36, 0.0011, 4680, 10, 8, 9.5),
                (8.575, -21.5, 0.02, 1387, 6, -9.5, 14), (8.815, -45, 0.0077, 9000, -4, 3, 19),
                (8.968, -38, 0.009, 2480, 8, 6, 12), (8.9818, -25.5, 0.00069, 3310, 2, -12, 4),
                (8.985, -31, 0.0077, 4480, 7, -2, -6), (9.025, -29.5, 0.00087, 1010, 10.5, -2, 5.5),
                (9.094, -37.5, 0.006, 800, 24, -6, -5), (9.255, -42, 0.018, 8000, 7, 6, 21.5),
                (9.308, -36, 0.014, 1600, 6, -17, 9), (9.314, -35, 0.0024, 734, 16, -5, 9.5),
                (9.365, -37.5, 0.024, 2450, 14, -18, -1)]


def rustles(count=120):
    """Superposition: swarms of creases gather and thin out; returns direct sound and what the walls hear."""
    direct, echo = 0, 0
    for s, db, length, hz, lead_db, crisp_db, echo_db in DESK_RUSTLES:
        chance = rng.random((count, 3))
        moments = s - length * np.log(chance[:, 0] * chance[:, 2]) / 2
        levels = db - 11.0 - 6 * chance[:, 1]
        facets = hz * 1.35 ** (chance[:, 1] - .5)
        body, crisp = np.full(count, 3.0), np.full(count, crisp_db)
        swarm = creases(moments, levels, body, crisp, facets, lead_db, 0.00044)
        direct, echo = direct + swarm, echo + undb(echo_db) * swarm
    return direct, echo


def tail(hz, t60):
    """Exponential decay: noise-tail spectra for four hand positions, each with a shared and an unshared row."""
    t = np.arange(SR) / SR
    decay = 10 ** (-3 * t / t60) * np.clip(t / 0.00019, 0, 1)
    noise = rng.standard_normal((4, 2, SR)) * decay / np.sqrt(t60 * SR / 14)
    band = np.exp(-np.log2((np.arange(SR // 2 + 1) + 1) / hz) ** 2)
    return rfft(noise) * band


# reverberation of the room by band, relative levels: (centre [Hz], decay by 60 dB [s], level [dB])
ROOM_BANDS = [(319, 0.63, 0.5), (800, 0.87, -4.5), (2000, 0.76, -1), (5000, 0.52, -8), (15800, 0.46, -10.5)]


def room(x):
    """Convolution: wall echoes, whose pattern changes among four hand positions as the hands move."""
    tails = irfft(sum(undb(db) * tail(hz, t60) for hz, t60, db in ROOM_BANDS))
    t = np.arange(N) / SR
    place = np.cos(np.pi * (t / .3 + np.arange(4)[:, None] / 4)) ** 2
    size = next_fast_len(N + SR)
    heard = sum(rfft(x * place[k] ** 2, size) * rfft(tails[k], size) for k in range(4))
    return irfft(heard, size)[:, :N]


ROOM_DB = -3.5  # gain of the echoes
SNAP_SHADE = 0.24  # share of each snap's amplitude that the hands keep from the walls
# how far the two ports differ: (frequency [Hz], gain of the unshared sound [dB])
PORT_DIFFERENCE = [(60, -14), (250, -13), (600, -11), (1200, -9), (2500, -6), (5000, -4.5), (7500, -7),
                   (9500, -15), (12000, -13), (16000, -12)]


def scene():
    """Sum and difference: the ports get the shared sound plus and minus the sound in which they differ."""
    near, far = rustles()
    snapped = snaps()
    handled = crackle() + crinkles() + snapped + thumps()
    # the close sound carries no deep bass: below about 110 Hz it falls away steeply
    close = colour(handled + near, lambda f: 1 / (1 + (110 / (f + 1)) ** 4))
    walls = undb(ROOM_DB) * room(handled[0] - SNAP_SHADE * snapped[0] + far[0])
    air = ducked_air(close)
    close = close + rumbles()
    shared = close[0] + walls[0] + air[0]
    unshared = close[1] + walls[1] + undb(2.0) * air[1]
    apart = colour(unshared, lambda f: undb(over_hz(PORT_DIFFERENCE, f)))
    return np.array([shared + apart, shared - apart])


TOP_HZ = 15750  # upper band edge
# the left port trails: (frequency [Hz], phase lag [radians])
LEFT_LAG = [(60, .15), (250, .4), (600, 1.2), (1200, 1.4), (2300, 1.1), (4500, 1.4), (6500, 1.7),
            (8400, 2.7), (10000, 3.14), (11800, 4.1), (14000, 5.8), (16000, 6.3)]


def record(dry):
    """Phase lag, saturation and band limiting: the left trails, peaks round off, lowest bass and top are cut."""
    left = colour(dry[0], lambda f: np.exp(-1j * over_hz(LEFT_LAG, f)))
    ports = np.array([left, dry[1]])
    ports = ports / (1 + abs(ports) ** 3) ** (1 / 3)
    bass_cut = signal.butter(2, 45, "high", fs=SR, output="sos")
    top_cut = signal.ellip(10, .3, 80, TOP_HZ, fs=SR, output="sos")
    ports = signal.sosfilt(top_cut, signal.sosfilt(bass_cut, ports))
    return np.clip(ports, -1, 1)


dry = scene()
out = record(dry)
log_audio(out)
```